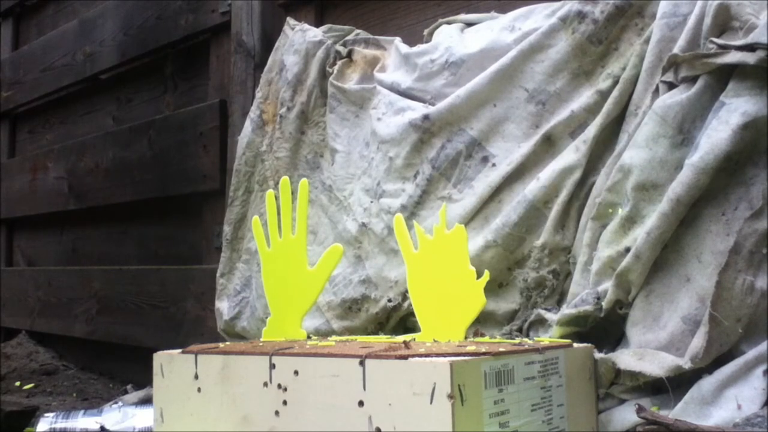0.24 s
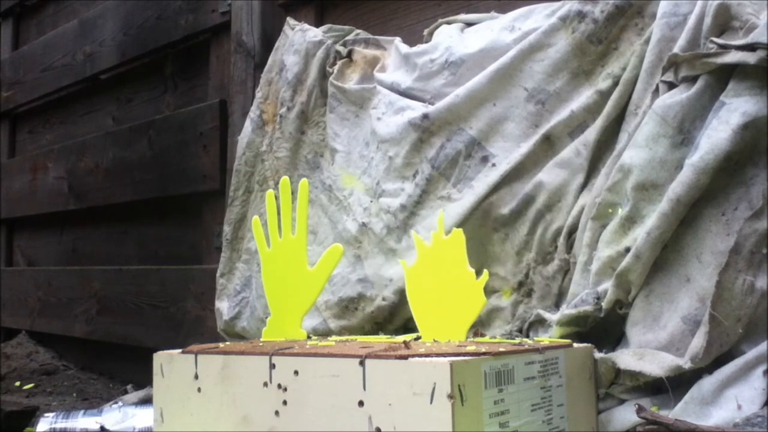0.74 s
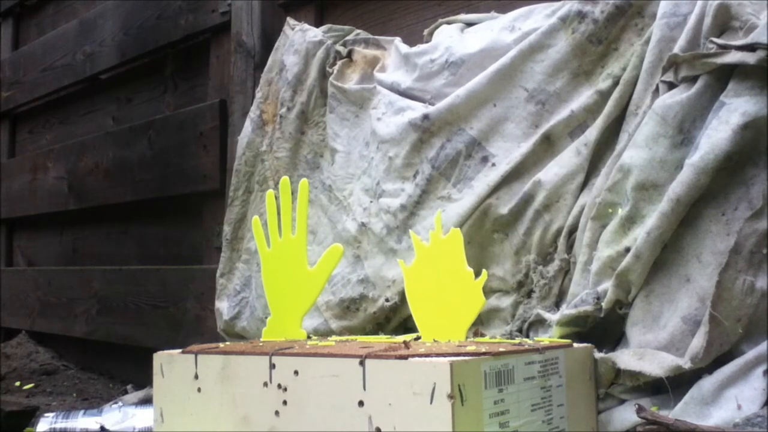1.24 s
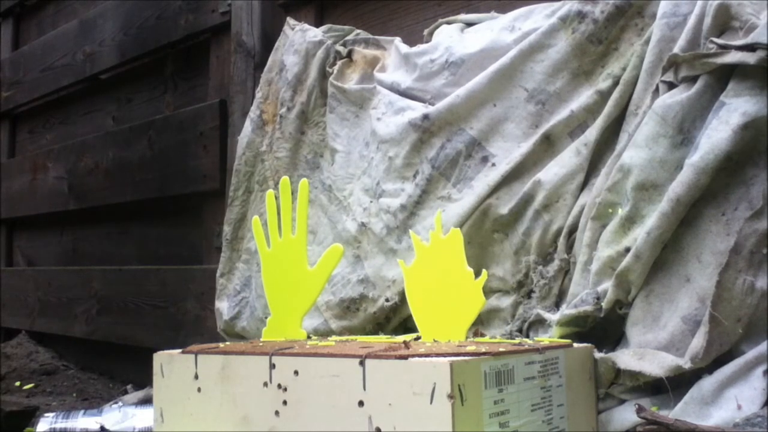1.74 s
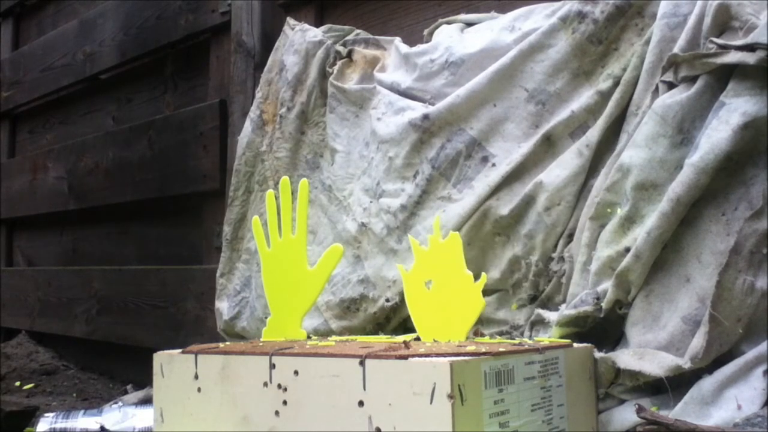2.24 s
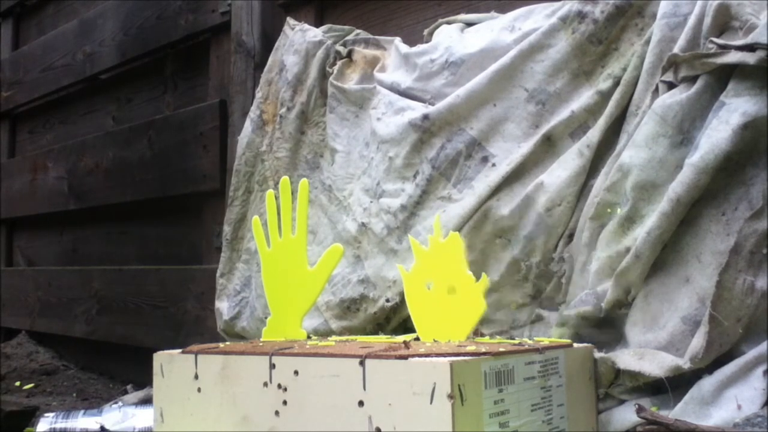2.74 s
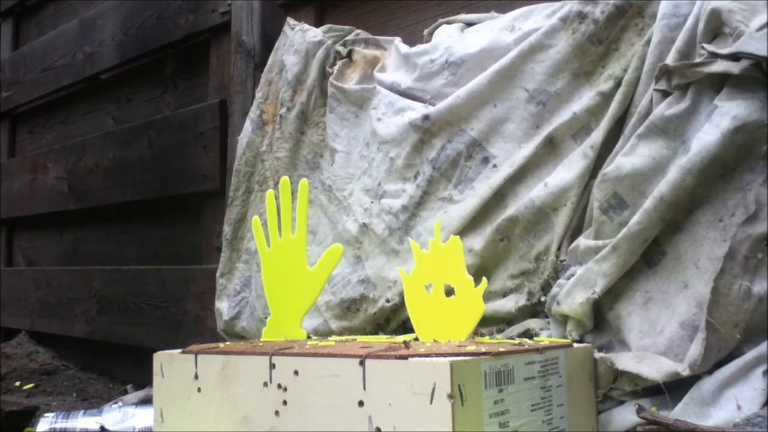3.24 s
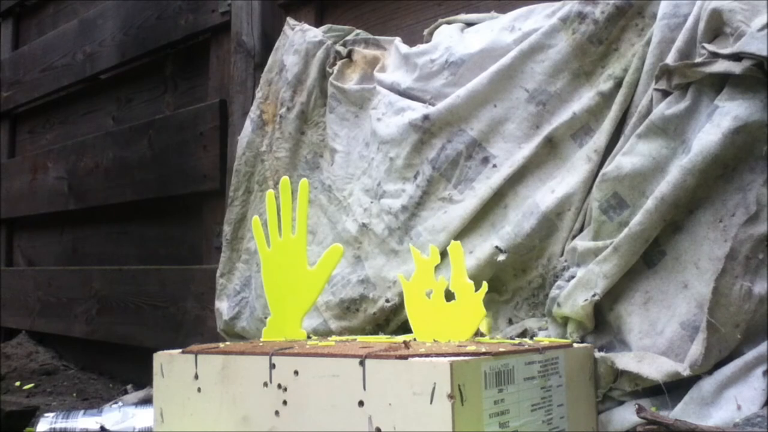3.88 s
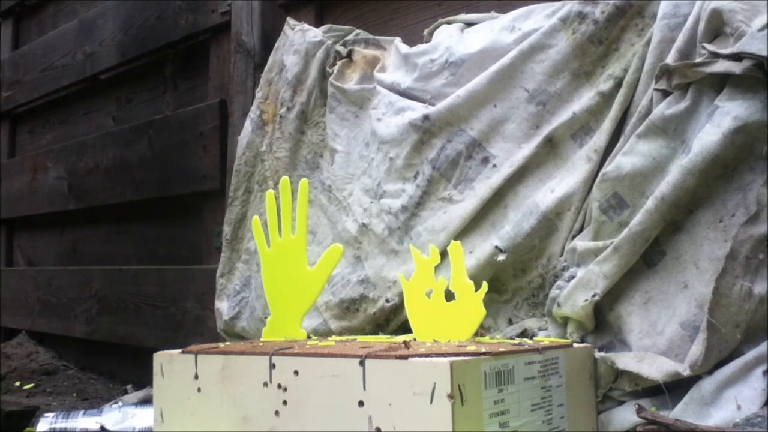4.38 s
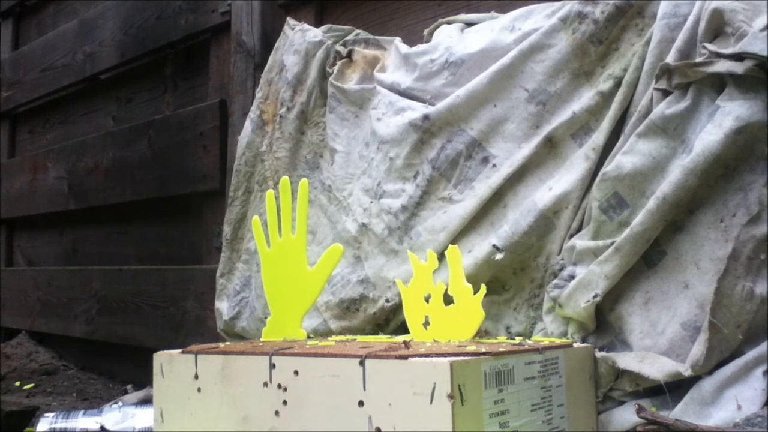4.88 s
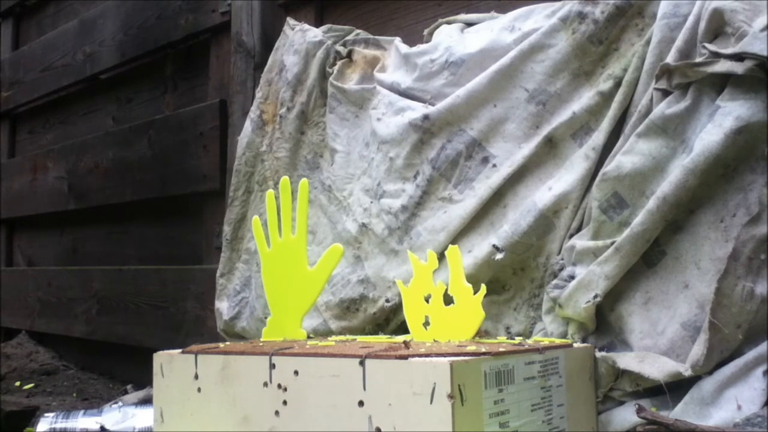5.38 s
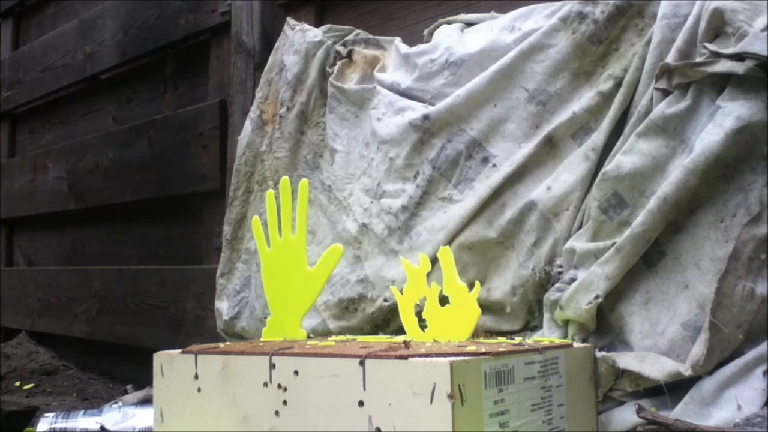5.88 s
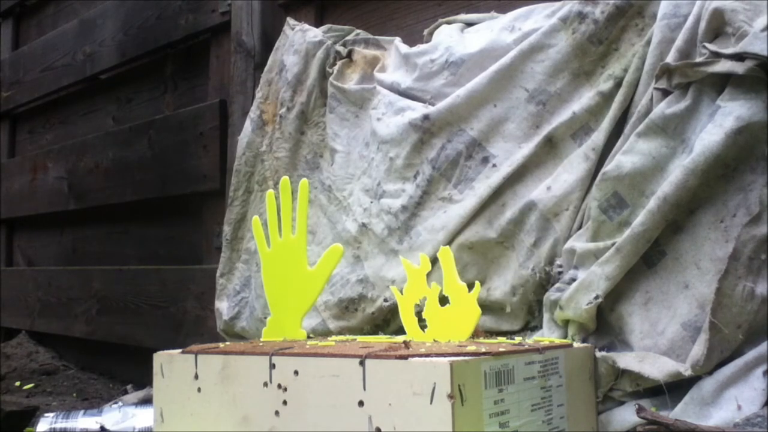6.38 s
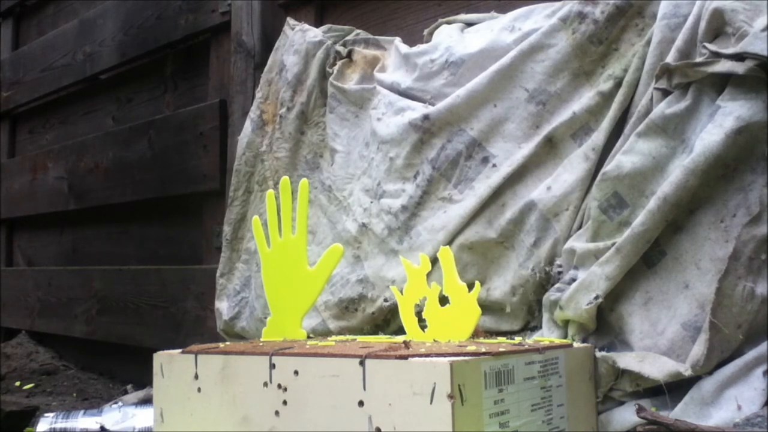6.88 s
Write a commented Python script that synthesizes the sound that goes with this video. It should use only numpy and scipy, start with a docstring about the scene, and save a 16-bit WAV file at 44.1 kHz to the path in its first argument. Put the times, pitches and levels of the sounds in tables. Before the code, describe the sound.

Six snapping air gun shots, about a second apart, crack into a plastic target outdoors, with a short echo and light falling chips.

```python
"""A fenced yard, one camera microphone near a spring air gun; distant traffic and rumble under its hiss. From
0.8 s, six shots: the spring rattles, the muzzle pops, the piston rings, then the pellet cracks a brittle
plastic target on a box and thuds into a tarpaulin, and the fences answer. A couple of splinters click before
the first shot; more splinters and spent pellets land afterwards; after the last shot a ricochet rings a metal
fitting. The background sinks at every shot and later steps back up."""
import sys
import numpy as np
from scipy import signal
from scipy.fft import rfft, irfft, next_fast_len
from scipy.io import wavfile
from scipy.ndimage import uniform_filter1d, map_coordinates

SR = 44100
rng = np.random.default_rng(int(sys.argv[2]) if len(sys.argv) > 2 else 0)


def generate_wav(signal):
    """Clip the signal to [-1, 1] and save it as 16-bit WAV at the path in sys.argv[1]."""
    frames = np.transpose(np.atleast_2d(signal))
    scaled = np.clip(frames, -1, 1) * 32767
    pcm = np.round(scaled).astype(np.int16)
    wavfile.write(sys.argv[1], SR, pcm)


N = 313992

# shots: pop t/s, gun level/dB, crack level/dB, crack f/Hz, slap level/dB, boom level/dB,
# target-to-tarpaulin t/s, thud level/dB
SHOTS = [(0.8292, 2, -5.5, 4500, -7, -24.5, 0.0028, 0), (2.1090, 2, -2.5, 3930, -7.5, -19.5, 0.003, -2.5),
         (2.8792, 2, -0.5, 3750, -17, -28.5, 0.0026, -12), (3.6100, 1.5, -1.5, 3400, -21, -39, 0.003, -1.5),
         (4.6195, 0.5, -2.5, 4340, -22.5, -33.5, 0.0034, -10.5),
         (5.8685, 1.5, -4.5, 4200, -11, -17, 0.0015, -8.5)]
# spring and barrel while the piston runs, and the spring twanging on: f/Hz, width/Hz, level/dB
SPRING_MODES = [(600, 1900, -6.5), (1508, 470, -1), (1880, 210, -4), (2630, 450, -2.5), (3770, 210, 0),
                (5300, 970, -7.5), (14600, 2500, -19)]
TWANG_MODES = [(2250, 400, 0), (3700, 500, -2), (4600, 300, 0), (5900, 700, -2)]
# paths to the microphone of the pop and of the piston's ring: delay/s, level/dB
POP_PATHS = [(0, -2), (.00197, -9)]
PISTON_PATHS = [(.00348, -2), (.00415, -10), (.0055, -11)]
# fence and box boards: f/Hz, width/Hz, level/dB
BOARD_MODES = [(481.5, 68, -3), (621.4, 74, 0.5), (1055, 130, -9.5), (1580, 290, -9)]
YARD_DECAY = [(60, .15), (250, 0.39), (700, 0.33), (1840, 0.23), (4850, 0.25), (12800, 0.28)]  # the yard's echo: f/Hz, t60/s
YARD_COLOUR = [(24, -65.5), (40, -38), (148, -8.5), (222, -2.5), (608, -7), (933, -6.5), (1510, 2.5),
               (2970, -0.5), (7560, -2.5), (15300, -15.5), (16500, -42.5)]  # its spectrum: f/Hz, level/dB
SPLINTERS = [(.1396, -39.5, 3220, 0.023), (0.206, -46.5, 4900, 0.023), (3.3028, -41, 11000, 0.0092),
             (3.9684, -43.5, 2970, 0.017), (3.996, -44.5, 1090, 0.029), (4.0128, -40.5, 2000, .02),
             (4.0234, -41, 1800, .015), (4.814, -42, 1800, 0.017), (4.8384, -39.5, 3500, 0.018),
             (4.8519, -36, 2560, 0.037), (4.877, -40.5, 1710, .02), (4.8852, -43, 2200, .02),
             (4.9214, -48, 12000, 0.031), (4.957, -44.5, 1600, 0.014), (4.9714, -43, 3500, 0.011),
             (5.0019, -46.5, 6000, 0.028), (5.010, -45, 1810, 0.027), (5.127, -43.5, 6000, .004),
             (5.31, -50, 2500, 0.09), (6.009, -32.5, 9450, 0.052), (6.078, -46, 2020, 0.019),
             (6.14, -48, 4000, .01), (6.3337, -51, 9100, 0.024), (6.383, -44.5, 9960, 0.011),
             (6.46, -51, 2500, 0.12), (6.6109, -47.5, 5000, 0.014)]  # splinters landing: t/s, level/dB, f/Hz, t60/s
# hard chips bouncing: t/s, level/dB, t60/s, pitch f/Hz, tilt below the pitch/(dB/octave)
CHIP_BOUNCES = [(3.266, -48.5, 0.052, 10000, 8), (4.0337, -47, 0.041, 2810, 10),
                (4.0709, -51.5, 0.031, 2800, 10), (4.083, -50, 0.017, 2900, 10),
                (4.9511, -43.5, 0.031, 10800, -1), (5.1701, -45, 0.035, 13500, -3),
                (5.2513, -56, .04, 9710, 9.5), (5.2959, -51, .05, 14800, 3), (6.545, -57, 0.17, 1700, 12)]
CHIP_MODES = [(.49, -3.5), (.73, -6.5), (1.0, 0), (1.27, -15)]  # a chip's modes: f/pitch, level/dB
PELLET_BOUNCES = [(5.0126, -47.5, 2), (5.0389, -49.5, -5), (5.049, -49, 4), (5.0893, -46, 8)]  # a pellet on a steel part: t/s, level/dB, tilt/(dB/octave)
STEEL_MODES = [(4630, 2.5, 0.076), (7150, -14, .07), (8830, 1.5, 0.044), (9240, -11, 0.066),
               (12480, -10.5, 0.054)]  # that part: f/Hz, level/dB, t60/s
FITTING_MODES = [(3900, -8, .3), (4820, -8, 0.97), (5170, -10, 0.59), (5900, -9, .23), (6170, -5, 0.32),
                 (6350, -1, 0.29)]  # the metal fitting: f/Hz, level/dB, t60/s
# spectra of distant rumble, distant traffic and the camera's hiss: f/Hz, level/dB
RUMBLE_SPECTRUM = [(12, -53.5), (20, -18), (86, 2.5), (140, 2), (209, -1), (330, -9), (430, -40),
                   (730, -120)]
TRAFFIC_SPECTRUM = [(160, -27.5), (280, 0.5), (412, -3.5), (682, -2.5), (733, -4), (1540, -12.5),
                    (2400, -23.5), (3120, -48), (5280, -120)]
HISS_SPECTRUM = [(1120, -33.5), (1900, 1.5), (2000, 0), (9460, -3.5), (14400, -8.5), (14900, -3.5),
                 (16000, -15.5)]
BACK_UP_TIMES = [.44, 1.39, 2.54, 3.38, 4.379, 5.359, 6.62]  # the background steps back up: t/s

FLIGHT_S = .0128  # muzzle to target
ECHO_GUN_DB, ECHO_HIT_DB, ECHO_BOARDS_DB = -22.5, -26, -39.5
RUMBLE_DB, TRAFFIC_DB, HISS_DB = -54.5, -54.5, -59.5  # before sinking
SINK_RUMBLE_DB, SINK_TRAFFIC_DB, SINK_HISS_DB, CREEP_DB_PER_S = -8.5, -3, -5, -4


def air_gun(out, s, gun_db, usual_rattle):
    """Near the microphone: the sear lets go, the spring rattles, the muzzle pops, the piston rings."""
    sear = burst([(2500, 4000, 0)], t60=.05, attack=.003, steep=True)
    add(out, s - .008, amp(gun_db - 38) * sear)
    rattle = .67 * usual_rattle + .8 * burst(SPRING_MODES, t60=.062, attack=.0008)
    add(out, s - .0053, amp(gun_db - 16.5) * rattle)
    for delay, db in POP_PATHS:
        add(out, s + delay - .00005, amp(gun_db + db) * spike())
    piston = ring(9600, t60=.0028, attack=.00015) + amp(-9) * ring(5600, t60=.003)
    for delay, db in PISTON_PATHS:
        add(out, s + delay, -amp(gun_db + db + 5) * piston)
    barrel_air = burst([(9000, 2100, 0)], t60=.15, attack=.0042)
    add(out, s - .004, amp(gun_db - 18.5) * barrel_air)


def spring_twang():
    """The spring rings on, its modes balanced differently each shot."""
    twang = [(hz, width, db + rng.normal(0, 3.3)) for hz, width, db in TWANG_MODES]
    return burst(twang, t60=.55, attack=.01, seconds=.6)


def pellet_impact(out, hit, crack_db, crack_hz, slap_db, boom_db, onward_s, thud_db):
    """Downrange: the plastic cracks and bends, its box booms and knocks, the tarpaulin thuds."""
    shards = [(crack_hz, 3000, 0), (8000, 2500, -1), (12800, 4000, -3)]
    add(out, hit, -amp(crack_db) * ring(crack_hz, t60=.005))
    add(out, hit, amp(crack_db - 3) * spike())  # first contact
    add(out, hit, amp(crack_db - 7.5) * burst(shards, t60=.017, attack=.0001))
    add(out, hit - .0003, -amp(slap_db) * ring(420, t60=.012, attack=.00042))  # the target bends back
    add(out, hit, amp(boom_db) * ring(125, t60=.035, attack=.00055))
    add(out, hit, amp(crack_db - 16) * burst(BOARD_MODES, t60=.03, attack=.0005))
    add(out, hit + onward_s, amp(crack_db - 12) * burst(shards, t60=.035, attack=.0001))
    add(out, hit + onward_s - .0002, amp(thud_db) * ring(650, t60=.0048, attack=.00026))


def yard_echo(source=np.ones_like):
    """The fences answer a source of some colour; each frequency dies at its own speed."""
    hz, t, noise = signal.stft(rng.standard_normal(SR), SR, nperseg=256)
    colour = amp(along(YARD_COLOUR, hz)) * abs(source(hz))
    decay = amp(-60 * t / along(YARD_DECAY, hz)[:, None])
    tail = signal.istft(noise * colour[:, None] * decay, SR, nperseg=256)[1]
    onset = 1 - np.exp(-np.arange(len(tail)) / SR / .0019)
    return onset * tail / np.sqrt(np.mean(tail[:SR // 50] ** 2))


def box_knock(piece_hz, t60):
    """A falling piece knocks on the box; small, bright pieces knock less."""
    db = -.5 - 4.5 * np.log2(piece_hz / 1000)
    return amp(db) * burst(BOARD_MODES, t60, attack=.00083)


def splinters(out):
    """Each splinter lands with a click and a knock."""
    for s, db, hz, t60 in SPLINTERS:
        click = burst([(hz, 1.6 * hz, 0)], t60, attack=.0002 + t60 ** 2, steep=True)
        add(out, s, amp(db) * (click + box_knock(hz, t60=.051)))


def chips(out):
    """Hard chips ring roughly, knock and click as they bounce."""
    for s, db, t60, hz, tilt in CHIP_BOUNCES:
        partials = [(k * hz, 220, mode_db + tilt * min(np.log2(k), 0)) for k, mode_db in CHIP_MODES]
        add(out, s, amp(db) * burst(partials, t60, attack=.0004))
        add(out, s, amp(db + 6) * box_knock(hz, t60=.059))
        add(out, s, amp(db - 8.5) * burst([(hz, .8 * hz, 0)], t60=.0092, attack=.00022))


def pellet_clinks(out):
    """A spent pellet bounces on a small steel part: ringing modes and a bright tick."""
    for s, db, tilt in PELLET_BOUNCES:
        for hz, mode_db, t60 in STEEL_MODES:
            gain = amp(db + mode_db + tilt * np.log2(hz / 8000) + rng.normal(0, 1.5))
            clink = .73 * ring(hz, t60, attack=.00062) + .36 * burst([(hz, 150, 0)], t60, attack=.0008)
            add(out, s, gain * clink)
        add(out, s, amp(db + 4.5) * burst([(7970, 9000, 0)], t60=.012, attack=.0002))


def ricochet(out, s, db):
    """A ricochet strikes a metal fitting, loosely held, so each mode has a rough fringe."""
    for hz, mode_db, t60 in FITTING_MODES:
        tone = ring(hz, t60, attack=.015, seconds=.6)
        fringe = burst([(hz, 120, 0)], t60, attack=.015, seconds=.6, steep=True)
        add(out, s, amp(db + mode_db) * (tone + .6 * fringe))


def background():
    """Rumble, traffic and a brief thin tone in the distance; at the camera, its own hiss and whine."""
    t = np.arange(N) / SR
    down, seconds_down = sinking(t)
    creep_db = CREEP_DB_PER_S * seconds_down  # traffic and hiss go on sinking
    rumble_db = RUMBLE_DB + SINK_RUMBLE_DB * down
    traffic_db = TRAFFIC_DB + SINK_TRAFFIC_DB * down + creep_db
    hiss_db = HISS_DB + SINK_HISS_DB * down + creep_db
    rumble = amp(rumble_db + 1.5 * wobble(13)) * steady_noise(RUMBLE_SPECTRUM)
    traffic = amp(traffic_db + 1.4 * wobble(4.1)) * steady_noise(TRAFFIC_SPECTRUM)
    whine = amp(-19 + 2.5 * wobble(40)) * np.sin(2 * np.pi * 14992 * t)
    camera = amp(hiss_db) * (steady_noise(HISS_SPECTRUM) + whine)
    tone_on = uniform_filter1d(1. * (t > 5.36) * (t < 5.85), size=SR // 100)
    far_tone = tone_on * amp(-66 + 2.5 * wobble(20)) * np.sin(2 * np.pi * 1954 * t)
    return rumble + traffic + camera + far_tone


def sinking(t):
    """Whether the background is down after a shot (0-1), and for how many seconds it has been."""
    down, since = np.zeros(N), np.zeros(N)
    starts = [-.15] + [shot[0] - .009 for shot in SHOTS]  # already down as the scene opens
    for start, end in zip(starts, BACK_UP_TIMES):
        inside = (t >= start) & (t < end)
        down += inside
        since += inside * (t - start)
    return uniform_filter1d(down, size=SR // 50), uniform_filter1d(since, size=SR // 50)


def spike():
    """A short suction spike with one rebound, at peak 1."""
    pulse = -ring(3900, t60=.0008, attack=.00001)
    return pulse / abs(pulse).max()


def ring(hz, t60, attack=.00005, seconds=.25):
    """A damped sine."""
    t = np.arange(round(seconds * SR)) / SR
    return np.sin(2 * np.pi * hz * t) * amp(-60 * t / t60) * (1 - np.exp(-t / attack))


def burst(table, t60, attack, seconds=.25, steep=False):
    """Dying noise through resonances (twice if steep); the envelope alone sets its energy."""
    t = np.arange(round(seconds * SR)) / SR
    shape = amp(-60 * t / t60) * (1 - np.exp(-t / attack))
    noise = filtered(rng.standard_normal(len(t)), lambda f: modes(table, f) ** (1 + steep))
    return unit(noise * shape) * np.sqrt(np.mean(shape ** 2))


def modes(table, f):
    """Causal response at f of resonances: f/Hz, width/Hz, level/dB."""
    return sum((-1) ** k * amp(db) * 1j * f * width / (hz * hz - f * f + 1j * f * width)
               for k, (hz, width, db) in enumerate(table))


def steady_noise(spectrum):
    """Coloured noise at rms 1."""
    return unit(filtered(rng.standard_normal(N), lambda hz: amp(along(spectrum, hz))))


def wobble(rate):
    """A smooth random curve, rate knots a second."""
    return map_coordinates(rng.standard_normal(int(N * rate / SR) + 4), [np.arange(N) * rate / SR])


def filtered(x, response):
    """x through a complex frequency response."""
    size = next_fast_len(len(x) + 8192)
    return irfft(rfft(x, size) * response(np.fft.rfftfreq(size, 1 / SR)), size)[:len(x)]


def along(points, hz):
    """Interpolates (f/Hz, value) points on a log axis."""
    f, values = np.transpose(points)
    return np.interp(np.log(hz + 1), np.log(f + 1), values)


def amp(db):
    """Gain of a level in dB."""
    return 10 ** (np.asarray(db) / 20)


def unit(x):
    """x at rms 1."""
    return x / np.sqrt(np.mean(x ** 2) + 1e-20)


def add(track, s, x):
    """Mixes x into the track from time s."""
    part = track[round(s * SR):][:len(x)]
    part += x[:len(part)]


def scene():
    """The yard from the one microphone: shots, their echoes, debris and background."""
    out = np.zeros(N)
    usual_rattle = burst(SPRING_MODES, t60=.051, attack=.00051)  # much alike every shot
    for s, gun_db, *impact in SHOTS:
        hit = s + FLIGHT_S
        air_gun(out, s, gun_db, usual_rattle)
        pellet_impact(out, hit, *impact)
        add(out, s, amp(gun_db - 41) * spring_twang())
        add(out, s, amp(ECHO_GUN_DB) * yard_echo(lambda f: 1.3 + modes(SPRING_MODES, f)))
        add(out, hit, amp(ECHO_HIT_DB) * yard_echo())
        add(out, hit, amp(ECHO_BOARDS_DB) * burst(BOARD_MODES, t60=.66, attack=.01, seconds=.6))
    splinters(out)
    chips(out)
    pellet_clinks(out)
    ricochet(out, s=6.012, db=-51.5)
    return (out + background())[None]


def record(dry):
    """The microphone drops deep bass, the input rounds off peaks, top treble fades to a band limit."""
    heard = filtered(dry[0], lambda hz: (1j * hz / (30 + 1j * hz)) ** 2)
    rounded = heard / (1 + abs(heard / 1.05) ** 8) ** (1 / 8)
    treble_fade = lambda hz: amp(np.interp(hz, [15600, 16000], [0, -22])) * (hz < 16672)
    return filtered(rounded, treble_fade)[None]


dry = scene()
out = record(dry)
generate_wav(out)
```